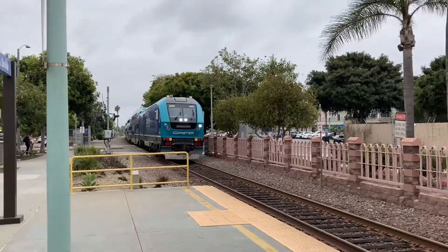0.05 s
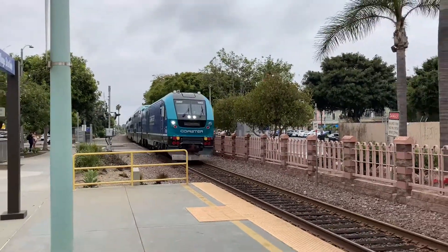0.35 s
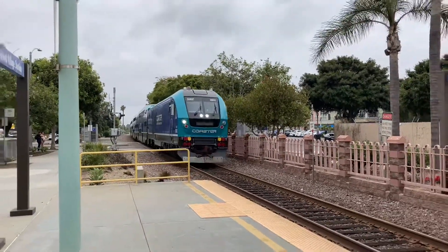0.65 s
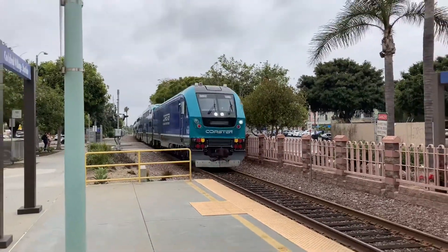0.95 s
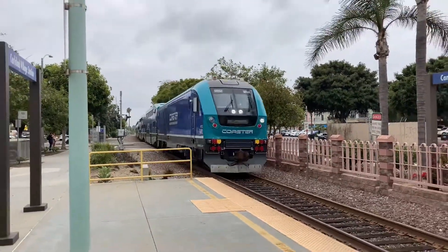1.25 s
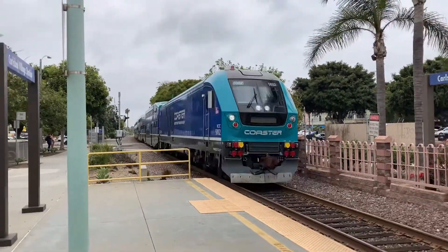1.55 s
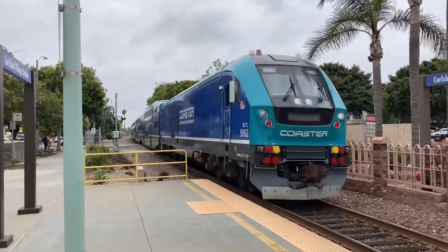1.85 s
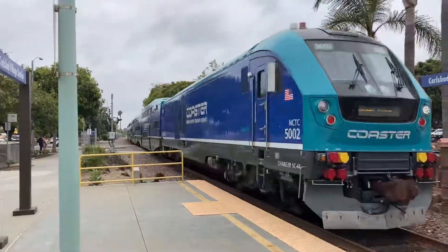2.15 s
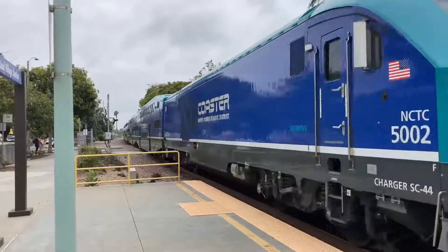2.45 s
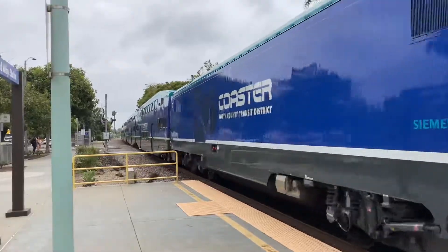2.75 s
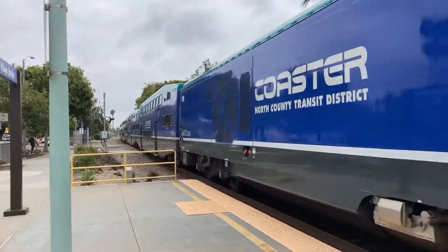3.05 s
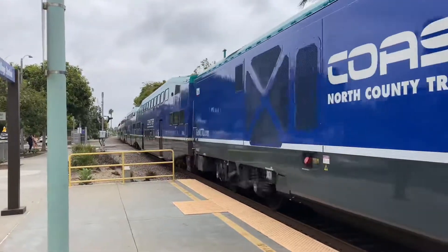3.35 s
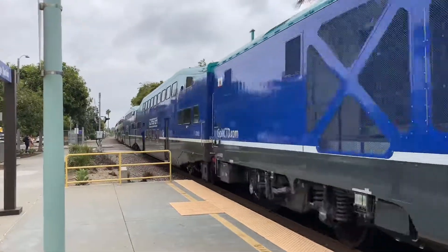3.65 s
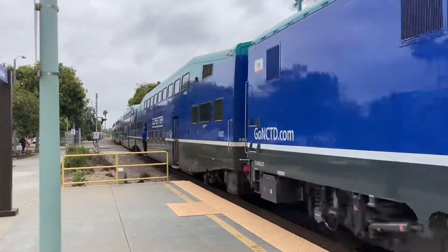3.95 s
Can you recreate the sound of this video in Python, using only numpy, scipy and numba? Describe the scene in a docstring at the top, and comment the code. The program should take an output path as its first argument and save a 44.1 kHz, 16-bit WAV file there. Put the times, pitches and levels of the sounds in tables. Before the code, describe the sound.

Heard from a station platform, a diesel train draws near, ringing its bell and spitting air. Its horn sounds briefly from ahead, then louder alongside, and the bell fades under close wheel noise and whining fans.

```python
"""A diesel passenger train rolls up to a platform, its bell striking steadily from the start.
Air spits over the engine's drone, the fans and the wheels. Near 0.9 s the five reeds of the
air horn sound a short, bright chord from ahead. The train grows louder, and near 2.9 s the horn
sounds again from beside the engine, loud and dull, while a gain control ducks under it.
The bell drops in pitch as it passes, and the machinery whines close by."""
import sys
import numpy as np
from scipy import signal
from scipy.fft import rfft, irfft, next_fast_len
from scipy.io import wavfile
from scipy.ndimage import uniform_filter1d, map_coordinates
from numba import njit

SR = 44100
rng = np.random.default_rng(int(sys.argv[2]) if len(sys.argv) > 2 else 0)


def to_wav(sig):
    """Store sig (one row per channel, or 1-D mono) as 16-bit WAV at the path in sys.argv[1].

    Samples outside -1..1 are clipped; the rate is SR.
    """
    pcm = np.clip(np.atleast_2d(sig), -1, 1) * 32767
    pcm = np.round(pcm).astype(np.int16)
    wavfile.write(sys.argv[1], SR, pcm.T)  # frames by channels


N = 176400


def amp(db):
    """Turn decibels into a gain."""
    return 10 ** (np.asarray(db) / 20)


def along(points, hz):
    """Read a value between rows of (Hz, value), on a log frequency scale."""
    freqs, values = np.transpose(points)
    return np.interp(np.log(hz + 1), np.log(freqs + 1), values)


def curves(rows):
    """Turn each column after the time into one value per sample."""
    times, *columns = np.transpose(rows)
    return [np.interp(np.arange(N) / SR, times, column) for column in columns]


def wobble(rate, size=N):
    """A smooth random curve through `rate` points a second."""
    return map_coordinates(rng.standard_normal(2048), [np.arange(size) * rate / SR], mode="wrap")


def filtered(x, response):
    """Scale each frequency of x by response(hz)."""
    size = next_fast_len(N + SR // 2)
    return irfft(rfft(x, size) * response(np.fft.rfftfreq(size, 1 / SR)), size)[..., :N]


def add(track, start, x):
    """Mix x into the track at a start time in seconds."""
    i = round(start * SR)
    x, i = x[..., max(-i, 0):], max(i, 0)
    track[..., i:i + x.shape[-1]] += x[..., :N - i]


def panned(db):
    """Two gains that make the left db louder than the right."""
    return amp([[db / 2], [-db / 2]])


def spread(x, lag_s):
    """The sound reaches the left side lag_s after the right."""
    return filtered(x, lambda hz: np.exp(1j * np.pi * hz * lag_s * np.array([[-1], [1]])))


# How alike the two sides are. Each row: frequency in Hz, likeness (1 the same, -1 opposite).
LIKENESS = [(60, 0.89), (450, 0.7), (1000, 0.94), (2000, -0.4), (4000, 0.87), (8000, -0.21), (12000, 0.24)]
def mid_side(hz):
    """Gains for the part both sides share (mid) and the part where they differ (side)."""
    angle = np.arccos(np.clip(along(LIKENESS, hz), -1, 1)) / 2
    return np.array([np.cos(angle), np.sin(angle)])


def rush(colour, patchy_db=1.3):
    """Stereo noise of a given colour, with random louder and softer patches."""
    cells = signal.stft(rng.standard_normal((2, N)), nperseg=1024)[2]
    patches = uniform_filter1d(rng.standard_normal(cells.shape[1:]), size=3, axis=0)
    patches = uniform_filter1d(patches, size=12, axis=1)
    patches /= np.sqrt(np.mean(patches ** 2))
    pair = signal.istft(cells * amp(patchy_db * patches), nperseg=1024)[1][:, :N]
    mid, side = filtered(pair, lambda hz: amp(along(colour, hz)) * mid_side(hz))
    return np.array([mid + side, mid - side]) / mid.std()


# The street's echo. Each row: frequency in Hz, seconds to fade by 60 dB.
ECHO_TIMES = [(200, 1.27), (450, 1.68), (750, 0.55), (2000, 1.9), (5000, 0.41), (12000, 0.3)]
def street_echo(x):
    """Trees, fences and houses scatter the sound into a fading tail."""
    hz, t, cells = signal.stft(rng.standard_normal((2, SR)), SR, nperseg=256)
    fade_s = along(ECHO_TIMES, hz)[:, None]
    fade = amp(-60 * t / fade_s) * (1 - np.exp(-t / 0.012)) / np.sqrt(fade_s)
    mid, side = signal.istft(cells * fade * mid_side(hz)[..., None], SR, nperseg=256)[1]
    tail = np.array([mid + side, mid - side])
    return signal.fftconvolve(x[None], tail / np.linalg.norm(tail[0]), axes=1)[:, :N]


# Single echoes. Each row: delay in seconds, level in dB compared with the street's echo.
HOUSE_FRONTS = [(0.109, -1.5), (.19, -7), (.37, -30.5)]
def wall_slaps(x, dull_above_hz=498):
    """House fronts throw back late, dull copies of the sound."""
    copies = lambda hz: sum(amp(db) * np.exp(-2j * np.pi * hz * delay) for delay, db in HOUSE_FRONTS)
    return filtered(x, lambda hz: copies(hz) / (1 + (hz / dull_above_hz) ** 4))


# The train's noise. Each row: time in seconds, then the level in dB of each of the five bands below.
BAND_LEVELS = [(0, -46.5, -51, -48, -58.5, -74), (.5, -42, -50, -49.5, -56.5, -64.5),
               (.85, -39.5, -48, -48.5, -53, -61.5), (1.35, -36.5, -40.5, -40.5, -43, -59),
               (1.62, -37.5, -46, -43, -53.5, -63), (2.1, -36.5, -41, -41.5, -49.5, -60.5),
               (2.5, -33.5, -37.5, -38, -47.5, -58), (2.88, -30.5, -32, -33, -43.5, -52.5),
               (3.24, -42.5, -35, -41, -38.5, -54.5), (3.449, -35, -26, -29, -35.5, -43.5),
               (3.701, -35, -29, -33.5, -32, -42.5), (4, -37.5, -29, -28, -32, -37)]
# The colour of each band, low to high. Each row: frequency in Hz, level in dB.
RUMBLE = [(20, -44), (40, -19), (62, 2.5), (80, 1), (110, -7.5), (160, -9.5), (230, -9), (330, -9.5),
          (700, -91)]
BODY = [(120, -5), (230, -3), (290, 5), (420, 7.5), (520, 0.5), (650, -11), (1000, -41)]
MIDDLE = [(400, -17), (650, -5), (880, 0.5), (1300, -2.5), (1750, -3.5), (2100, -12), (3200, -31)]
TREBLE = [(1200, -74), (1900, -1.5), (2800, -0.5), (3600, -5), (4800, -7.5), (6000, -11), (9000, -34)]
FIZZ = [(3500, 6), (5500, -25.5), (7200, 8), (11500, 11.5), (15500, 3)]
def rolling():
    """Wheels, exhaust and cooling air: five bands of noise that swell as the engine nears."""
    bands = zip(curves(BAND_LEVELS), (RUMBLE, BODY, MIDDLE, TREBLE, FIZZ))
    noise = sum(amp(db + .8 * wobble(15)) * rush(colour) for db, colour in bands)
    return spread(noise, lag_s=.00006)


# Puffs of air. Each row: start in seconds, fade time in seconds, level in dB.
SPITS = [(0.028, 0.22, -60.5), (.19, 0.23, -62.5), (0.571, 0.069, -56), (0.638, 0.17, -46.5),
         (1.758, 0.18, -47)]
# Their colour. Each row: frequency in Hz, level in dB.
SPIT_COLOUR = [(3000, -28), (5000, -9), (7200, -2.5), (12000, 4), (15500, 1)]
def air_spits():
    """Compressed air escapes in short hisses."""
    level, t = np.zeros(N), np.arange(SR) / SR
    for start, length, db in SPITS:
        add(level, start, amp(db) * (1 - np.exp(-t / 0.02)) * np.exp(-(t / length) ** 2))
    return level * rush(SPIT_COLOUR)


# Thin tones. Each row: pitch in Hz, loudest moment in seconds, fade time in seconds, level in dB.
WHINES = [(2420, 0.46, 5.1, -56), (1106, 3.71, 0.37, -35), (485, 3.71, .4, -33.5)]
def whines():
    """Machinery whines swell as each unit faces the platform, wavering differently on each side."""
    out, t = np.zeros((2, N)), np.arange(N) / SR
    for hz, peak_s, length, db in WHINES:
        swell = np.exp(-((t - peak_s) / length) ** 2)
        for side in out:
            side += swell * amp(db + 3 * wobble(14)) * np.sin(2 * np.pi * hz * t + .6 * wobble(25))
    return out


# Two fans. Each row: time in seconds, low pitch in Hz, its level in dB, high pitch in Hz, its level.
FAN_TONES = [(0, 299.8, -46, 405.6, -46), (.6, 301, -53, 421, -44.5), (1.6, 290.6, -43.5, 416, -41),
             (2.3, 286, -37, 426.2, -39.5), (2.85, 282.7, -29, 423.4, -28), (3.25, 285, -30.5, 426, -34.5),
             (3.5, 283.1, -27.5, 424.6, -23), (4, 279.4, -39, 423.6, -18)]
# The high fan's harmonics. Each row: multiple of the pitch, level in dB.
HIGH_FAN_HARMONICS = [(1, -1), (2, -15), (3, -16.5), (4, -18.5), (6, -19), (7, -27.5), (8, -17)]
def fans(octave_db=-13.5):
    """Cooling fan blades hum two unsteady tones: a low one with its octave, and a whining high one."""
    low_hz, low_db, high_hz, high_db = curves(FAN_TONES)
    low_fan = (low_hz, low_db, [(1, 0.002), (2, octave_db)])
    high_fan = (high_hz, high_db, HIGH_FAN_HARMONICS)
    out = np.zeros((2, N))
    for hz, db, harmonics in (low_fan, high_fan):
        phase = 2 * np.pi * np.cumsum(hz) / SR
        for k, level in harmonics:
            waver = 0.86 * wobble(18) + 0.21 * wobble(17) * np.array([[1], [-1]])
            out += amp(db + level + 2.9 * wobble(21)) * np.sin(k * phase + waver)
    return out


# The diesel. Each row: time in seconds, firings per second, level in dB.
FIRING = [(0, 72.6, -40), (.55, 70.6, -42.5), (1.2, 70.43, -36.5), (1.6, 69.4, -38.5), (2.2, 70.14, -33),
          (2.8, 69.1, -35), (3.4, 67.7, -49), (4, 68.6, -49)]
# Its tones. Each row: multiple of the firing rate, level in dB.
ENGINE_TONES = [(1, -2), (1.5, -13.5), (2.5, -24.5)]
def engine(throb_db=3.5):
    """The firing cylinders make a low, throbbing drone."""
    hz, db = curves(FIRING)
    phase = 2 * np.pi * np.cumsum(hz) / SR
    drone = np.zeros(N)
    for k, level in ENGINE_TONES:
        drone += amp(db + level + throb_db * wobble(9.28)) * np.sin(k * phase + .5 * wobble(15))
    return np.sqrt(2) * drone


# Bell strokes. Each row: start in seconds, level in dB, extra treble in dB, left over right in dB.
STROKES = [(-.32, -28.5, 7, -4), (0.343, -39, 0.5, -1), (1.015, -33.5, 4, 1), (1.683, -29.5, 2, 0.5),
           (2.366, -25, -3, 3.5), (3.039, -39, -13, 0), (3.709, -49, -4, 5)]
# The ring. Each row: pitch in Hz, level in dB, seconds to fade by 60 dB, seconds to swell.
BELL_TONES = [(1021, -2.5, 0.081, 0.0035), (1576, -0.5, 0.66, 0.0014), (1630, -25, .8, .01),
              (1744, 5, 0.91, 0.012), (1788, -3.5, 1.04, 0.022), (2570, -21.5, 1.4, 0.004),
              (2780, -11, 0.65, .005), (2860, -10, 0.98, 0.005), (2800, -17, 0.46, 0.0053),
              (3510, -13, 0.35, 0.0055), (4150, -5, 0.35, 0.1), (4220, 4, 0.26, 0.083)]
# Where the extra treble goes. Each row: frequency in Hz, share of it.
TREBLE_SHARE = [(1800, 0), (2800, 1)]
# The pitch drop of the passing bell. Each row: time in seconds, pitch multiplier.
DOPPLER = [(0, 1.002), (1.9, 1.0), (2.45, .994), (2.85, .984), (3.4, .96), (4, .95)]
# The noise of the hit. Each row: frequency in Hz, level in dB.
CLANG_COLOUR = [(400, -19), (950, -8), (1600, 2), (2200, -8.5), (3000, -3), (5000, -34), (12000, -32)]
def bell(clang_db=-3, clang_fade_s=0.36, echo_db=-1.5, wall_s=0.33, wall_db=-8.5, wall_dull_hz=2200):
    """Each stroke clangs, then the metal rings and wavers; a far wall sends the ring back."""
    ring, clang, t = np.zeros((2, N)), np.zeros(N), np.arange(SR) / SR
    for start, db, treble_db, pan_db in STROKES:
        doppler_time = np.cumsum(np.interp(start + t, *np.transpose(DOPPLER))) / SR
        for hz, level, fade_s, swell_s in BELL_TONES:
            phase = 2 * np.pi * hz * doppler_time + 1.4 * wobble(80, size=SR)
            struck_db = db + level + treble_db * along(TREBLE_SHARE, hz)
            tone_db = struck_db - 60 * t / fade_s + 4 * wobble(35, size=SR)
            swell = 1 - np.exp(-(t / swell_s) ** 2)
            add(ring, start, panned(pan_db) * amp(tone_db) * swell * np.sin(phase))
        hit_db = db + treble_db / 2 + clang_db - 60 * t / clang_fade_s
        add(clang, start, amp(hit_db) * (1 - np.exp(-t / 0.01)))
    far_wall = lambda hz: np.exp(-2j * np.pi * hz * wall_s) / (1 + (hz / wall_dull_hz) ** 8)
    echoes = amp(wall_db) * filtered(ring, far_wall) + amp(echo_db) * street_echo(ring.mean(axis=0))
    return spread(ring, lag_s=0.00015) + echoes + clang * rush(CLANG_COLOUR)


# The base pitches in Hz of the horn's five reeds, low to high.
REED_HZ = [315, 374, 436, 500, 630]
# Their timing. Each row: delay in seconds, base swell time in seconds, share by which it starts
# sharp, base linger time in seconds. A blast's sluggishness multiplies both base times.
REEDS = [(0.0256, 0.045, 0.03465, 0.024), (0.0165, 0.013, 0.03446, 0.018), (0.0139, 0.012, 0.033, 0.011),
         (0.0047, 0.0063, 0.03, 0.022), (0.002, 0.00091, 0.0215, 0.0023)]
def horn_chord(t, playing, first_four_db, colour, jitter, flutter):
    """Five reeds speak in turn, start sharp and settle; overtones arrive late and leave early."""
    held, release, sluggish, bloom_s, blare, grow_db_per_s, tuning = playing
    settle_s, sag_per_s, blare_s = .06, .065, 0.027
    chord, size = np.zeros(len(t)), len(t)
    for hz, (delay, swell, sharp, linger), levels in zip(REED_HZ, REEDS, first_four_db):
        age = np.maximum(t - delay, 0)
        bend = sharp * np.exp(-age / settle_s) - sag_per_s * (t - held / 2)
        pitch = hz * tuning * (1 + bend + jitter * wobble(170, size))
        phase = 2 * np.pi * np.cumsum(pitch) / SR
        speak = (1 - np.exp(-age / (swell * sluggish))) * np.exp(flutter * wobble(130, size))
        bloom = 1 - np.exp(-age / bloom_s)
        for k in range(1, 17):
            tone_hz = k * hz
            db = levels[k - 1] if k <= len(levels) else along(colour, tone_hz)
            growth_db = grow_db_per_s * (k > 1) * (np.minimum(t, held) - held / 2)
            rise = speak * bloom ** min((tone_hz / 2530) ** 2, 3)
            closing = (np.maximum(t - held - linger * sluggish / k, 0) / release) ** 2
            fall = np.exp(-closing * (.5 + min(tone_hz / 1420, 1)))
            # The first reeds to speak get all the air, so the start blares.
            burst = 1 + blare * min(tone_hz / 1200 + .5, 2) * np.exp(-t / blare_s)
            # Each tone fades and swells as its paths through the air shift.
            drift_db, waver = 3.6 * wobble(19, size), .6 * wobble(24, size)
            tone = np.sin(k * phase + waver + rng.uniform(0, 2 * np.pi))
            chord += amp(db + growth_db + drift_db) * rise * fall * burst * tone
    return chord


# Two blasts. Each row: start, hold and release in seconds, sluggishness of the reeds, overtone swell
# time in seconds, opening blare, overtone growth in dB per second, level in dB, pitch multiplier,
# air hiss and echo in dB compared with that level, left over right in dB.
BLASTS = [(.894, 0.1926, 0.14, 3.9, 0.048, 0.92, -8, -18.5, 1.003, -7.5, -10.5, 0.1),
          (2.911, 0.2, 0.062, 0.51, 0.0043, 2.26, 19, -12.5, .983, -23.5, -18, -1.5)]
# The horn from ahead and from beside. Each row: one reed's first four harmonics in dB.
FIRST_FOUR_AHEAD = [(-0.33, -38, 0.5, -14.5), (-5.8, -0.5, -2, -9), (0.47, 1, -9.5, -4),
                    (0.51, -6, -21, -11.5), (2.2, -11.5, -16, -14.5)]
FIRST_FOUR_BESIDE = [(-4, -2.5, -7, -10.5), (-1.5, -0.5, -18, -23), (3.5, -10.5, -12.5, -19),
                     (4, -12, -18.5, -23), (-4.5, -15.5, -8, -43)]
# The colour of the higher harmonics, and of the air. Each row: frequency in Hz, level in dB.
COLOUR_AHEAD = [(1500, -3.5), (2000, -10), (3000, -16), (5000, -29.5), (8000, -29), (15000, -80)]
COLOUR_BESIDE = [(1500, -15.5), (2100, -20.5), (2500, -27), (4000, -42), (8000, -54.5), (15000, -73)]
AIR_COLOUR = [(200, -4), (600, -11), (1500, 0), (3000, -4), (5500, -15), (8000, -23.5), (12000, -16),
              (16000, -39)]
def horn():
    """Air rasps through the reeds in two blasts, and the street echoes each chord."""
    out, t = np.zeros((2, N)), np.arange(int(.6 * SR)) / SR
    hiss = rush(AIR_COLOUR) * np.exp(0.2 * wobble(430))
    ahead = dict(first_four_db=FIRST_FOUR_AHEAD, colour=COLOUR_AHEAD, jitter=.009, flutter=.2)
    beside = dict(first_four_db=FIRST_FOUR_BESIDE, colour=COLOUR_BESIDE, jitter=.0075, flutter=.2)
    for row, voice in zip(BLASTS, (ahead, beside)):
        start, held, release, sluggish, bloom_s, blare, grow, db, tuning, air_db, echo_db, pan_db = row
        playing = (held, release, sluggish, bloom_s, blare, grow, tuning)
        blast, air = np.zeros(N), np.zeros(N)
        add(blast, start, amp(db) * horn_chord(t, playing, **voice))
        airflow = (1 - np.exp(-t / bloom_s)) ** 3 * np.exp(-(np.maximum(t - held, 0) / release) ** 2)
        add(air, start, amp(db + air_db) * airflow)
        echoes = amp(echo_db) * (street_echo(blast) + wall_slaps(blast))
        out += spread(blast, lag_s=0.00013) * panned(pan_db) + echoes + air * hiss
    return out


# The stereo balance. Each row: frequency in Hz, left over right in dB.
BALANCE = [(60, -2), (200, -.5), (400, 0), (700, 0), (1300, 3), (2400, 2.5), (4400, -0.5), (15000, 0.5)]
def scene():
    """The whole train, heard from the platform."""
    train = horn() + bell() + rolling() + spread(engine() + fans(), lag_s=.0001) + whines() + air_spits()
    return filtered(train, lambda hz: amp(along(BALANCE, hz) * np.array([[.5], [-.5]])))


@njit
def follow(target, attack, release):
    """Follow a curve, quickly upward and slowly downward."""
    out, now = np.zeros(len(target)), 0.0
    for i in range(len(target)):
        now += (target[i] - now) * (attack if target[i] > now else release)
        out[i] = now
    return out


def record(dry):
    """A gain control turns loud moments down; peaks are rounded and the highest treble is cut."""
    threshold_db, squeeze, attack_s, release_s, top_hz = -15, 0.74, 0.02, 0.29, 15800
    power = uniform_filter1d(np.mean(dry ** 2, axis=0), size=600)
    excess_db = np.maximum(10 * np.log10(np.abs(power) + 1e-12) - threshold_db, 0)
    cut_db = follow(squeeze * excess_db, 1 / (attack_s * SR), 1 / (release_s * SR))
    ducked = dry * amp(-cut_db)
    rounded = ducked / (1 + ducked ** 8) ** (1 / 8)
    return filtered(rounded, lambda hz: hz < top_hz)


dry = scene()
out = record(dry)
to_wav(out)
```